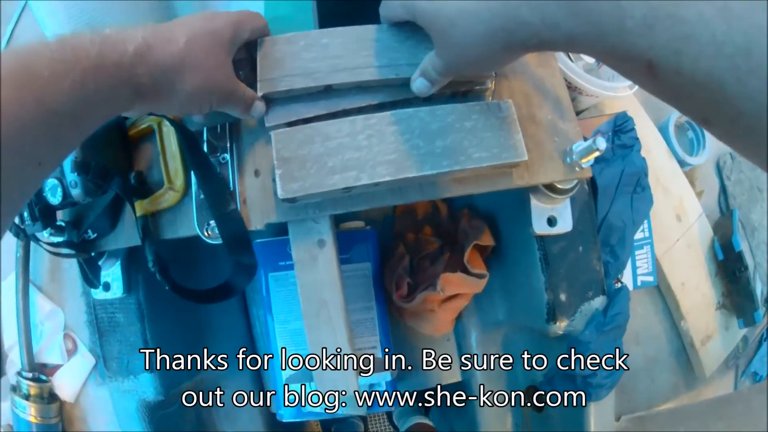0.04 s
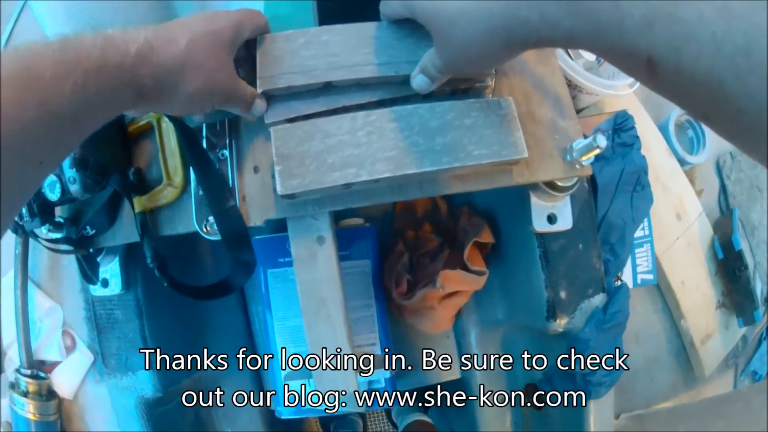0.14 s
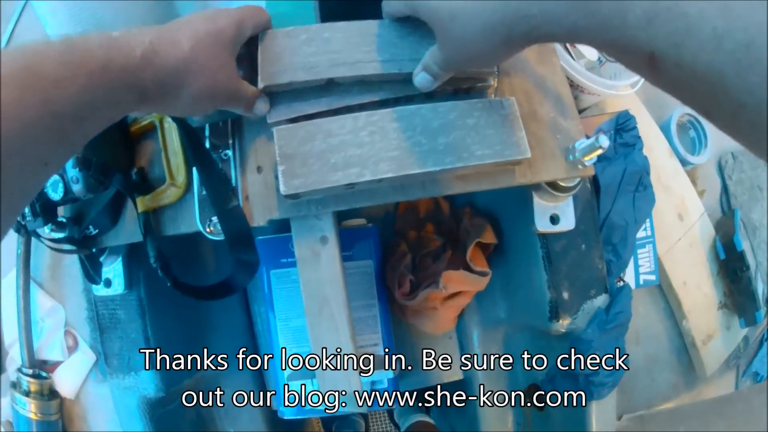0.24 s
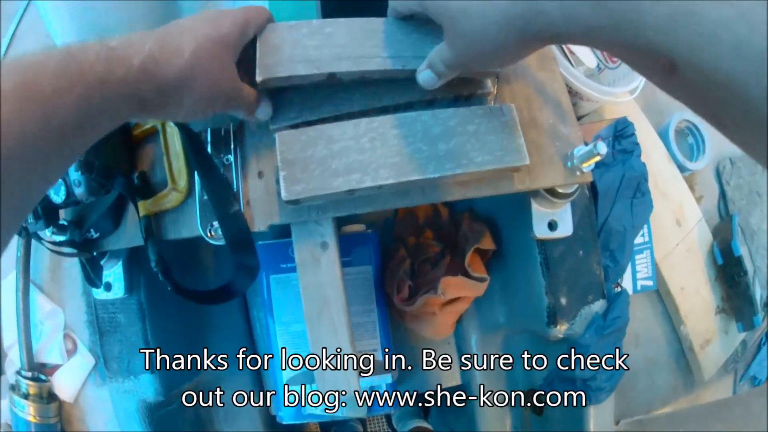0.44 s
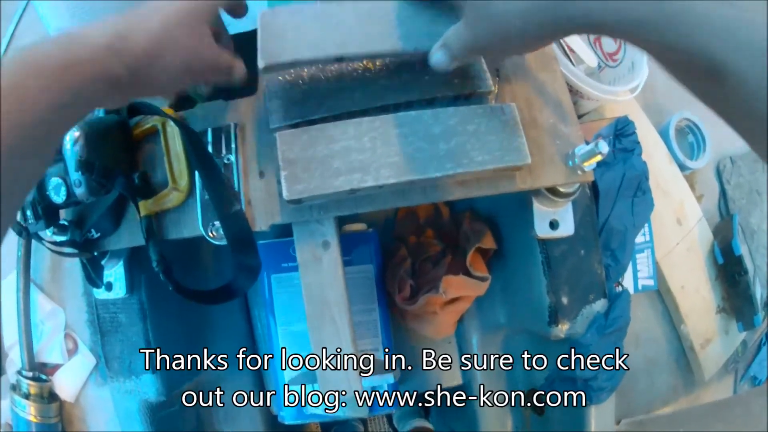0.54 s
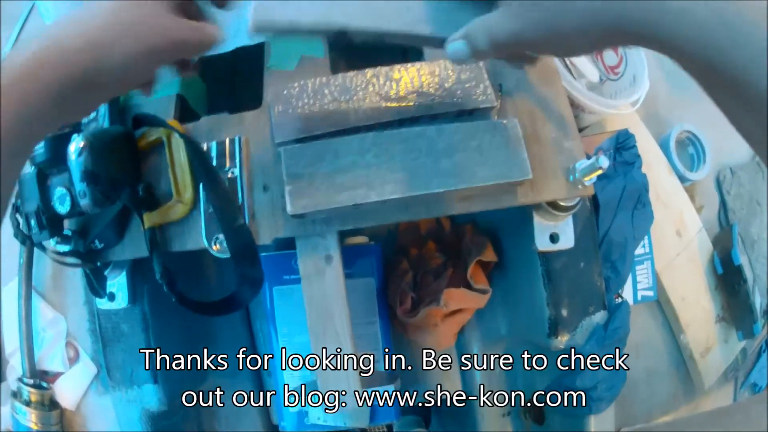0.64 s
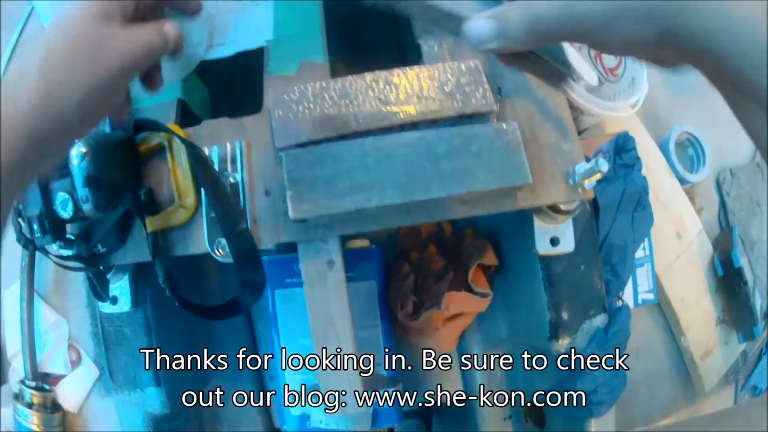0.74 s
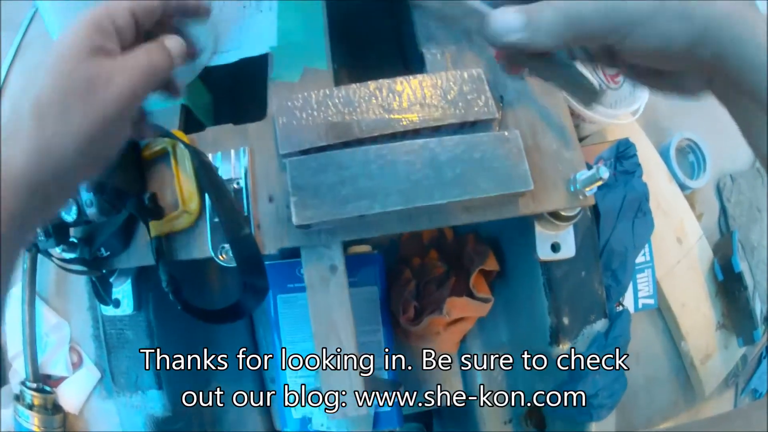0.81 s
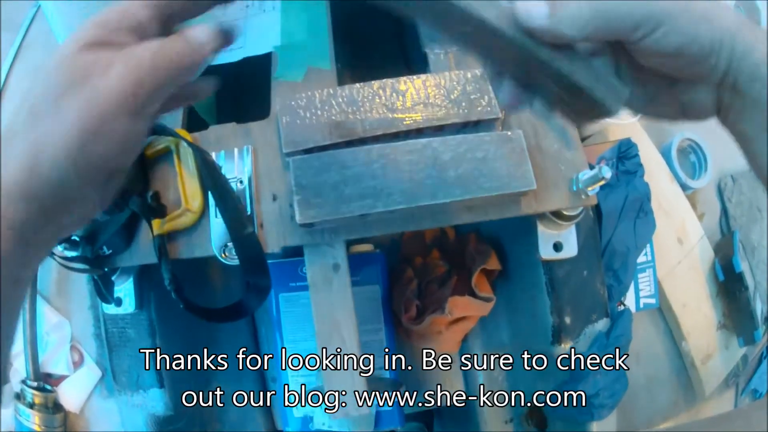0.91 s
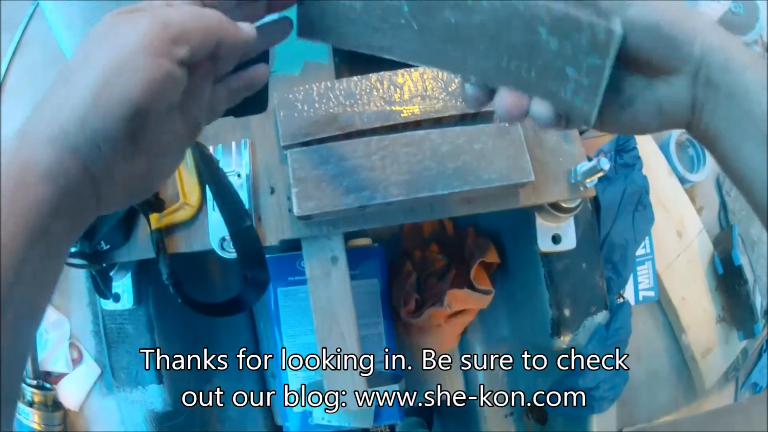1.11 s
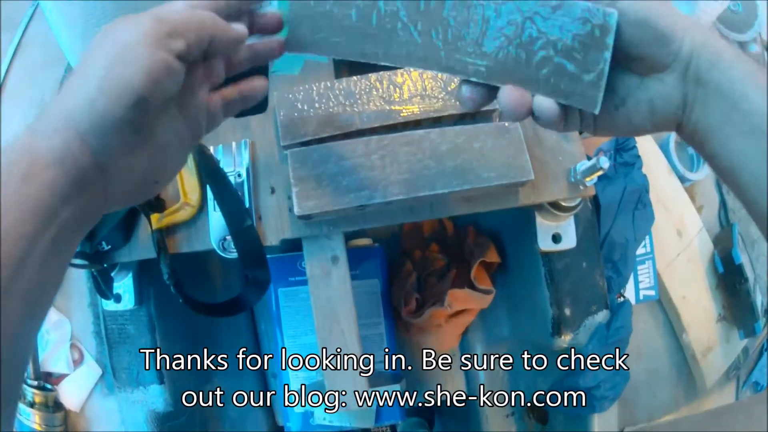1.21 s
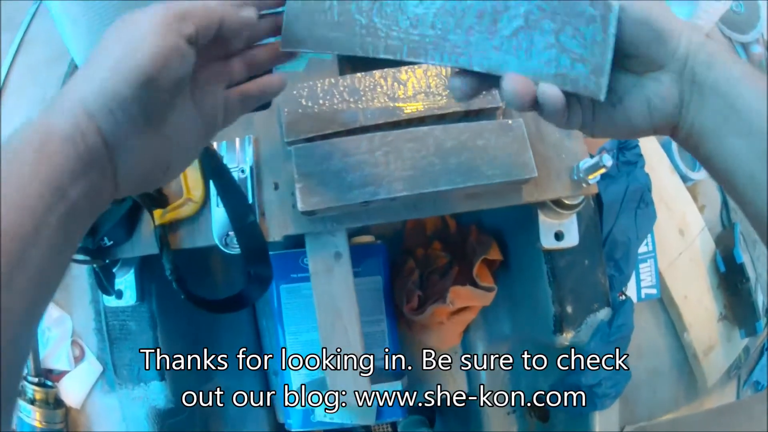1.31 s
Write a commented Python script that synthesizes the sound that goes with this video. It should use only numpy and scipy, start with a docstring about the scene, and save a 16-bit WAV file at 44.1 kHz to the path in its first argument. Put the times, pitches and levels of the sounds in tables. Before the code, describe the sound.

Sharp wood-on-wood knock and short rattle of plywood blocks, a hollow bench boom beneath

```python
"""In a shed, heard through a small camera's microphone: a faint room rumble runs throughout, made of noise.
At 0.23 s a plywood block is knocked against others on a workbench: a sharp crack of noise and ringing edges,
then a rattle of duller knocks on ringing blocks, loose blocks clattering and the bench top booming below.
Two soft taps of a lifted block come among the last faint knocks, and a small dry tick at 1.05 s.
The camera samples at 8 kHz in companded steps and holds each sample, mirroring the sound up into the treble."""
import sys
import numpy as np
from scipy import signal
from scipy.io import wavfile
from scipy.ndimage import uniform_filter1d

SR = 44100
rng = np.random.default_rng(int(sys.argv[2]) if len(sys.argv) > 2 else 0)


def unload_audio(sound):
    """Save the sound as a 16-bit wav file, at the path given as the first command line argument."""
    columns = np.transpose(np.atleast_2d(sound))
    # keep every value between -1 and 1, then stretch to whole-number steps
    steps = np.round(np.clip(columns, -1, 1) * 32767)
    wavfile.write(sys.argv[1], SR, steps.astype(np.int16))


def gain_from_db(level_db):
    """Turn a decibel level (scalar or array-like) into a linear amplitude factor."""
    decades = np.asarray(level_db, float) / 20
    return 10 ** decades


N = 59535  # length in samples, 1.35 s


def read(points, hz):
    """Reads a spectrum table on a log-frequency axis."""
    f, value = np.transpose(points)
    return np.interp(np.log(hz + 1), np.log(f + 1), value)


def add(mix, start_s, sound):
    """Mixes a sound in at a start time, cut off at the end of the mix."""
    part = mix[round(start_s * SR):][:len(sound)]
    part += sound[:len(part)]


def high_pass(x, order, cut_hz):
    """Butterworth high-pass: weakens the sound below the cut."""
    return signal.sosfilt(signal.butter(order, cut_hz, "high", fs=SR, output="sos"), x)


def coloured(spectrum, patchy_db):
    """Noise of rms 1 from random short-time spectra with drifting patches."""
    frames = N // 256 + 5
    hz = np.fft.rfftfreq(1024, 1 / SR)
    real, imaginary, patches = rng.standard_normal((frames, 513, 3)).T
    patches = uniform_filter1d(patches, 6, 0)  # smooth over frequency
    patches = uniform_filter1d(patches, 10, 1)  # and over time
    gain_db = read(spectrum, hz)[:, None] + patchy_db * patches / patches.std()
    noise = signal.istft((real + 1j * imaginary) * gain_from_db(gain_db), nperseg=1024, noverlap=768)[1][:N]
    return noise / noise.std()


def ring(modes, contact_ms):
    """Dying modes pushed by a soft contact: a longer contact sounds duller."""
    t = np.arange(SR // 2) / SR
    body = sum(gain_from_db(db - 60 * t / t60) * np.sin(2 * np.pi * hz * t) for hz, db, t60 in modes)
    phase = np.arange(0, 1, 1000 / (max(contact_ms, 0.05) * SR))
    push = np.sin(np.pi * phase) ** 2 + 1e-9
    return signal.fftconvolve(body, push / push.sum())


# Spectrum of the room's rumble. Each row: frequency in Hz, relative level in dB per Hz.
RUMBLE_SPECTRUM = [(15, -36), (25, -12.5), (49, 0.5), (122, -11.5), (246, 2), (292, -13.5), (612, -14.5),
                   (667, -25), (710, -9.5), (935, -19), (1130, -15), (1210, -21.5), (1660, -20.5),
                   (1920, -26.5), (3000, -21.5), (3550, -22.5), (3950, -35), (5140, -69), (8690, -120)]


def rumble():
    """The room's faint rumble: steady noise, mostly low, with slightly drifting patches."""
    return gain_from_db(-45) * coloured(RUMBLE_SPECTRUM, patchy_db=1)


# Wood striking wood on the workbench.
# Each row: start in seconds, knock level in dB, contact time in ms, crack level in dB.
KNOCKS = [(0.2251, -20.5, 1.23, -16.5), (0.2288, -23.5, 0.36, -20.5), (0.2355, -18.5, 2.1, -22),
          (0.2383, -23.5, 4.4, -28), (0.2553, -9.5, 1.11, -39), (0.2579, -10.5, 2.56, -30.5),
          (0.2612, -18, 2.5, -32), (0.2614, -22.5, 0.66, -41), (.2665, -25, .5, -46),
          (0.2697, -12.5, 3.23, -50), (0.2814, -12, 2.31, -48), (0.287, -22.5, 4.4, -37.5),
          (.2960, -34, 0.47, -46), (0.309, -26, 2.9, -52), (0.3305, -35.5, 1.2, -44),
          (0.3478, -16.5, 2.5, -41.5), (.3530, -34, 1.9, -45.5), (0.3587, -14.5, 3.4, -40),
          (0.3702, -28, 1.6, -52), (0.3872, -18, 3.6, -47), (0.3894, -12.5, 3.7, -48.5),
          (.3950, -40, 1.8, -47), (.4014, -33, 1.6, -50), (0.4254, -22.5, 4.57, -55),
          (0.4571, -36, 2.05, -56), (0.6, -44, 3, -51), (0.631, -45, 2.4, -61), (.6560, -45.5, 1.6, -58),
          (0.724, -61, 1, -46), (.7680, -50, 1.2, -47.5), (.7160, -50, 0.86, -45.5),
          (.7520, -52, 1.5, -42.5), (0.758, -45.5, 1.7, -43)]
# Modes of the plywood blocks. Each row: frequency in Hz, relative level in dB, t60 in seconds.
BLOCK_MODES = [(249.1, -6.5, 0.21), (288.8, -10.5, .18), (365, 6, 0.055), (385.9, -7, 0.16),
               (497.6, -3.5, 0.18), (569.6, -5, .13), (437, -12, 0.071), (770, -7.5, 0.074),
               (848, -27, 0.065), (947, -8.5, 0.15), (1098, -11.5, 0.13)]


def knocked_blocks():
    """Each knock rings the modes of the blocks, duller the longer the contact lasts."""
    out = np.zeros(N)
    for start_s, knock_db, contact_ms, _ in KNOCKS:
        add(out, start_s, gain_from_db(knock_db) * ring(BLOCK_MODES, contact_ms))
    return out


# Short high modes of the struck edge. Each row: frequency in Hz, relative level in dB, t60 in seconds.
EDGE_MODES = [(1531, -5.5, 0.068), (2127, -6.5, 0.036), (2735, -4, 0.039), (3420, -6.5, 0.072)]
# Spectrum of the crack's noise. Each row: frequency in Hz, relative level in dB per Hz.
CRACK_SPECTRUM = [(290, -33), (500, -1.5), (1290, -11.5), (1530, -11.5), (2630, -13.5), (3280, -12),
                  (3900, -11.5), (5070, -70), (8580, -120)]


def crack():
    """Each knock rings the struck edge and throws a burst of noise, with a softer, longer tail in the shed."""
    rise_s, crack_t60_s = 0.00097, 0.044
    shed_db, shed_t60_s = -13.5, 0.23  # the tail's level is relative to the crack
    t = np.arange(SR // 2) / SR
    decay = gain_from_db(-60 * t / crack_t60_s) + gain_from_db(shed_db - 60 * t / shed_t60_s)
    shape = np.minimum(t / rise_s, 1) * decay
    edge, power = np.zeros(N), np.zeros(N)
    for start_s, _, _, crack_db in KNOCKS:
        add(edge, start_s, gain_from_db(crack_db) * ring(EDGE_MODES, contact_ms=0.25))
        add(power, start_s, (gain_from_db(crack_db) * shape) ** 2)
    return edge + np.sqrt(power) * coloured(CRACK_SPECTRUM, patchy_db=3.0)


# Spectrum of the loose blocks' clatter. Each row: frequency in Hz, relative level in dB per Hz.
CLATTER_SPECTRUM = [(450, -23), (720, -5.5), (800, 1), (980, -1.5), (1180, -6.5), (1400, -19.5),
                    (2200, -31)]


def clatter():
    """Each knock shakes the loose blocks into a short woody rattle of noise, weaker for a long contact."""
    level_db, t60_s, rise_s = -20, 0.097, 0.004  # level relative to the knock
    t = np.arange(SR // 2) / SR
    shape = np.minimum(t / rise_s, 1) * gain_from_db(level_db - 60 * t / t60_s)
    power = np.zeros(N)
    for start_s, knock_db, contact_ms, _ in KNOCKS:
        shake = gain_from_db(knock_db) / max(contact_ms, 1)
        add(power, start_s, (shake * shape) ** 2)
    return np.sqrt(power) * coloured(CLATTER_SPECTRUM, patchy_db=1.5)


# Pushes that swell the bench's low boom. Each row: push time in seconds, level in dB, base t60 in seconds.
PUSHES = [(0.2281, -10.5, 0.41), (.2380, -29, 0.11), (0.258, -5.5, 0.42), (0.27, -11, 0.13),
          (0.28, -12, 0.041), (0.3327, -24.5, 0.27), (0.352, -9.5, .29), (.3636, -12, 0.11),
          (0.3836, -9.5, 0.074), (0.4113, -19, .06), (0.4396, -22.5, 0.23), (0.5196, -26.5, 0.18),
          (0.5272, -32.5, 0.095), (0.5896, -32.5, 0.16), (0.6486, -29.5, 0.14), (0.656, -29, 0.35),
          (0.704, -29, 0.13), (.7500, -31.5, 0.25), (0.7568, -35, 0.16), (0.7741, -24.5, 0.14),
          (0.82, -29, 0.062)]
# Modes of the bench top. Each row: frequency in Hz, relative level in dB, share of the push's base t60.
BENCH_MODES = [(151.6, 0.6, 1), (680, -26, .8)]


def bench():
    """The bench top booms under every push, damped more or less by hands and load."""
    delay_s = 0.00084  # small delay that keeps the boom in step with the knocks after the low cut
    out = np.zeros(N)
    for push_s, db, t60 in PUSHES:
        modes = [(hz, mode_db, share * t60) for hz, mode_db, share in BENCH_MODES]
        add(out, push_s + delay_s, gain_from_db(db) * ring(modes, contact_ms=4.0))
    return high_pass(out, 2, 120)  # the bench radiates poorly below its ring


# The lifted block brushing its neighbour. Each row: start in seconds, level in dB.
TAPS = [(.713, -40.5), (.7527, -44)]
# Modes of the block held in the hand. Each row: frequency in Hz, relative level in dB, t60 in seconds.
LIFTED_MODES = [(497, -1, 0.47), (975, -5, 0.21)]


def lifted_block():
    """Two soft taps ring the modes of the block held in the hand."""
    out = np.zeros(N)
    for start_s, db in TAPS:
        add(out, start_s, gain_from_db(db) * ring(LIFTED_MODES, contact_ms=0.91))
    return out


# Modes of the small dry tick. Each row: frequency in Hz, level in dB, t60 in seconds.
TICK_MODES = [(2930, -40.5, 0.026), (3300, -36, 0.019)]


def tick():
    """One very short high ring from a brief contact."""
    out = np.zeros(N)
    add(out, 1.0535, ring(TICK_MODES, contact_ms=0.3))
    return out


def scene():
    """Rumble, knocked blocks with their crack, clatter, bench, lifted block and tick, as one channel."""
    small = high_pass(knocked_blocks() + crack(), 2, 125)  # the blocks move little air below this
    # low cut on blocks and bench together: little deep bass in the wood
    wood = high_pass(small + bench(), 3, 115)
    return (rumble() + wood + clatter() + lifted_block() + tick())[None]


def low_pass(x):
    """Removes everything above the highest recorded frequency."""
    return signal.sosfilt(signal.butter(12, 16590, fs=SR, output="sos"), x)


def record(dry):
    """The small camera samples at 8 kHz in companded steps, holds each sample and limits the band."""
    antialias_hz, edge_hz = 3723, 15300
    mu, steps = 255, 200  # companding curve, and steps on each side of zero
    x = signal.sosfilt(signal.cheby1(6, 0.5, antialias_hz, fs=SR, output="sos"), dry)
    x = np.clip(signal.resample_poly(x, 80, 441, axis=1), -1, 1)  # to 8 kHz
    # logarithmic steps: fine for quiet sound, coarse for loud
    code = np.round(steps * np.log1p(mu * abs(x)) / np.log1p(mu))
    stepped = np.sign(x) * np.expm1(code / steps * np.log1p(mu)) / mu
    # each sample held four times, at 32 kHz: mirror images appear above 4 kHz
    held = np.repeat(stepped, 4, axis=1)
    x = signal.resample_poly(held, 441, 320, axis=1)[:, :N]
    band_limit = signal.firwin(511, edge_hz, window=("kaiser", 4), fs=SR)
    mix = signal.oaconvolve(x, band_limit[None], "same")
    return low_pass(mix)


dry = scene()
out = record(dry)
unload_audio(out)
```